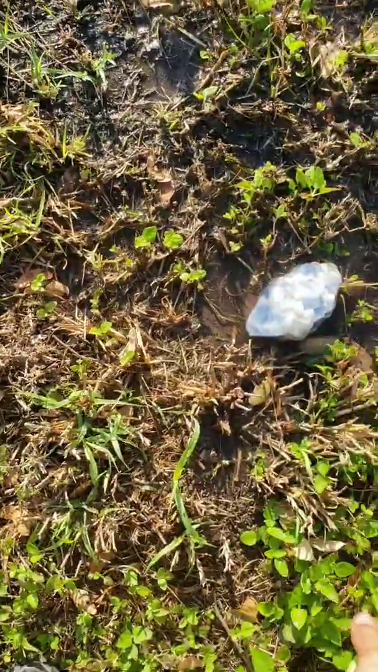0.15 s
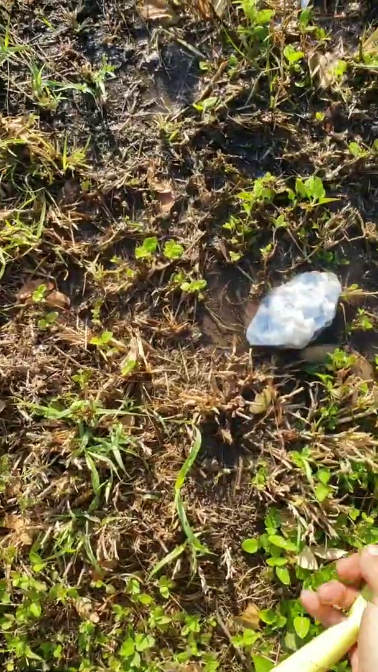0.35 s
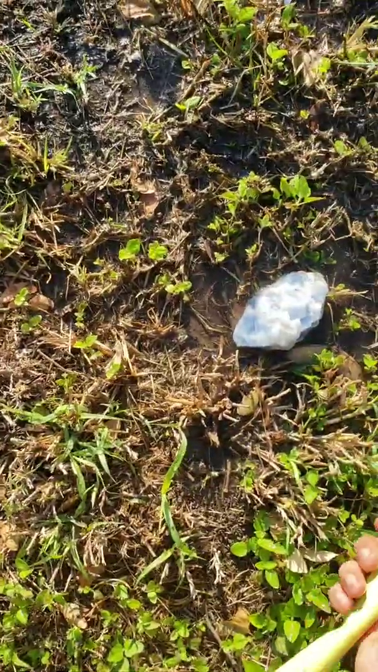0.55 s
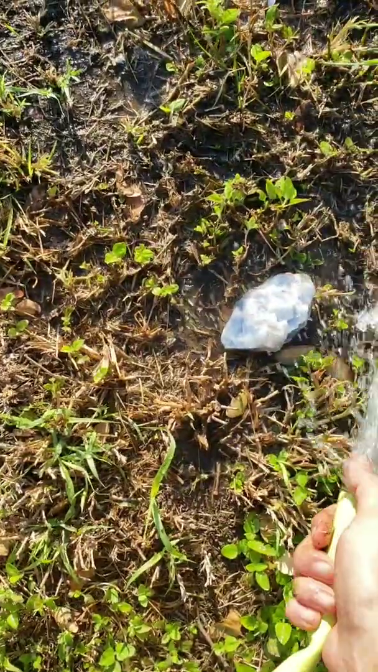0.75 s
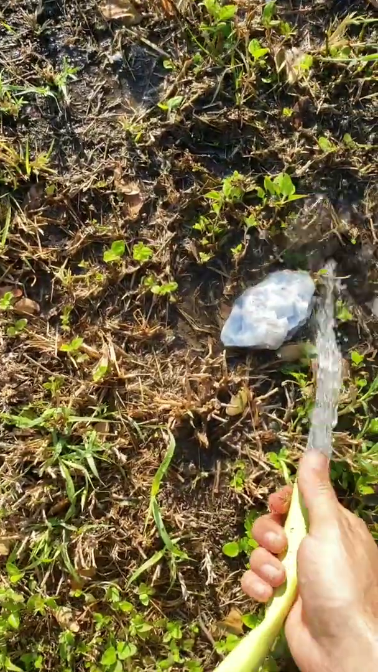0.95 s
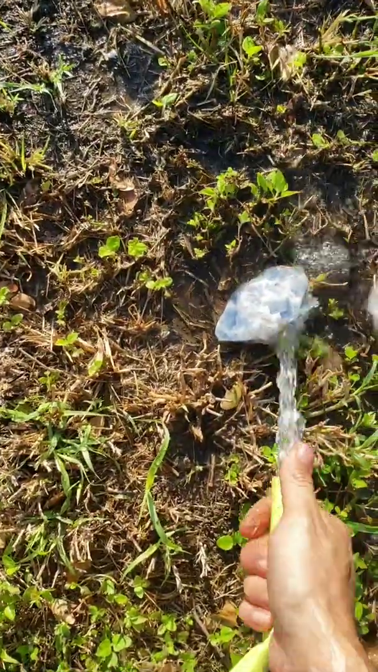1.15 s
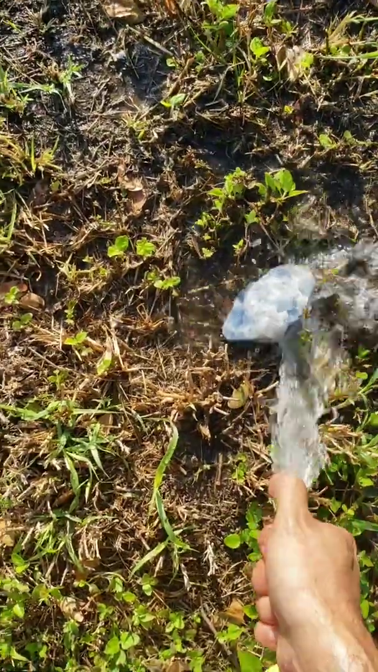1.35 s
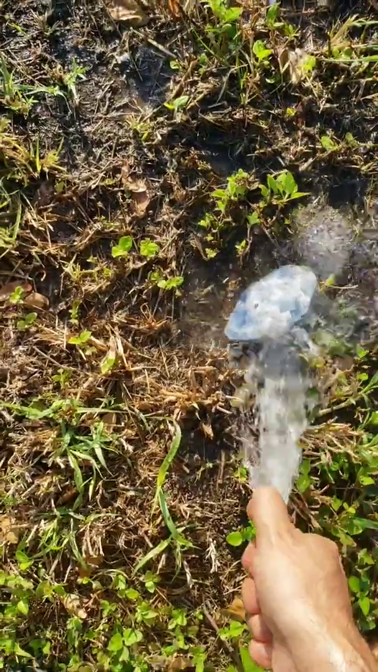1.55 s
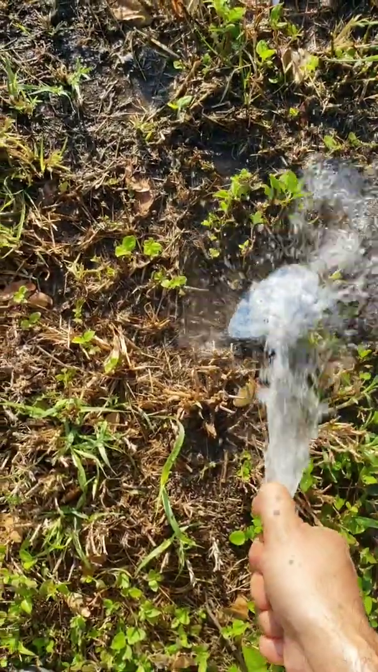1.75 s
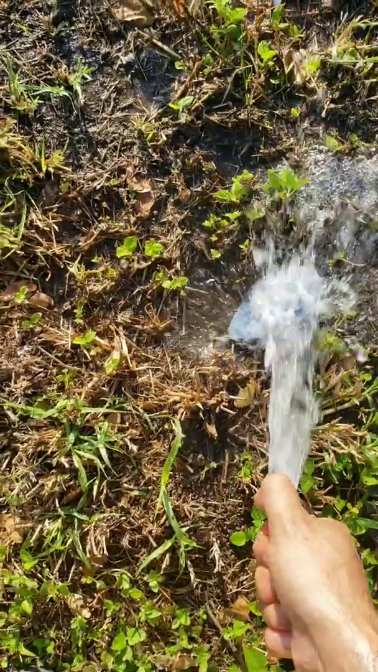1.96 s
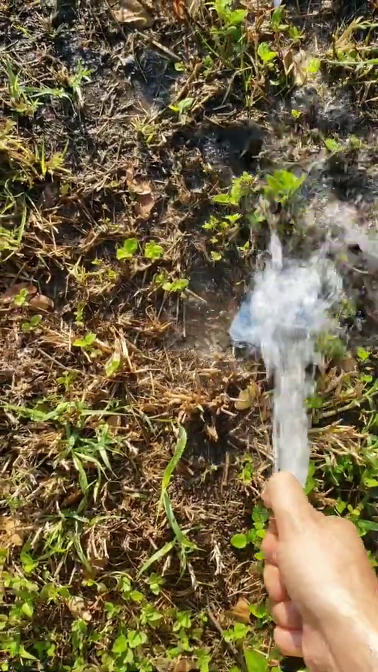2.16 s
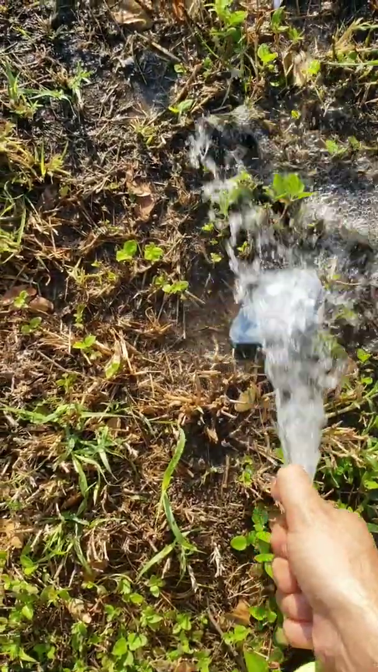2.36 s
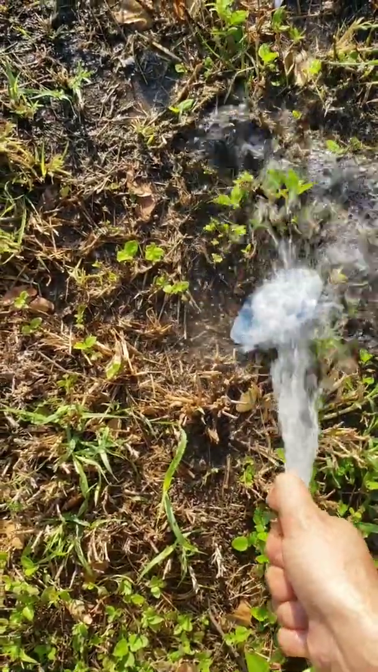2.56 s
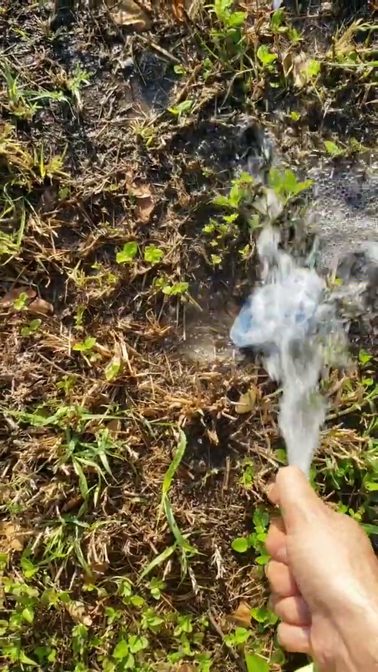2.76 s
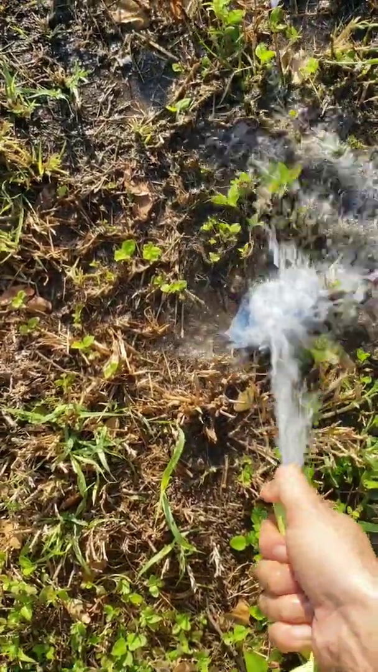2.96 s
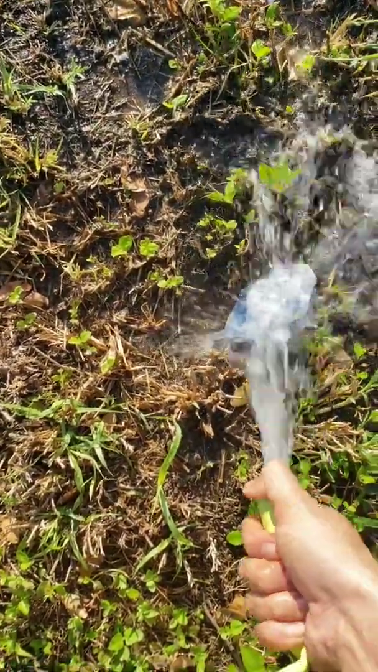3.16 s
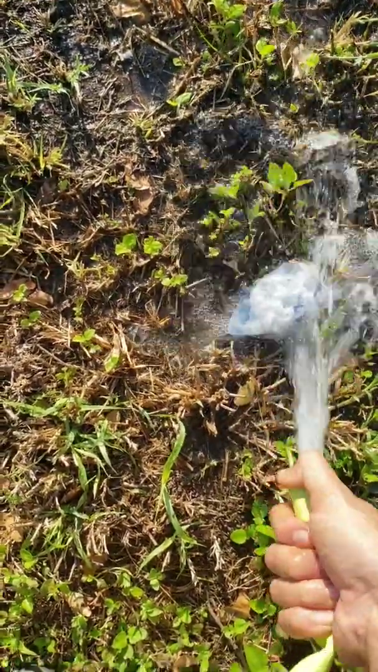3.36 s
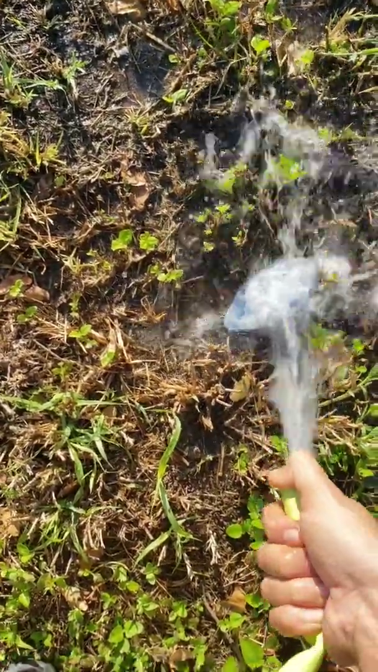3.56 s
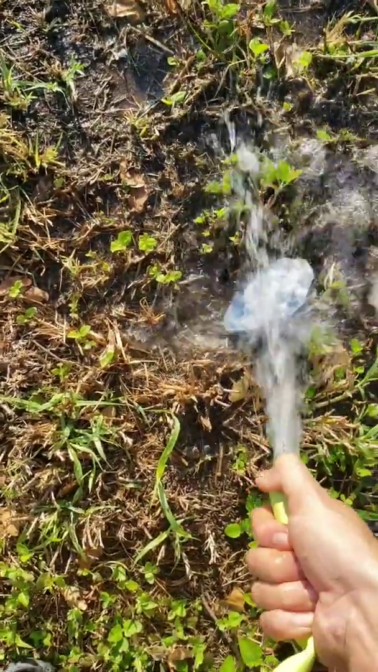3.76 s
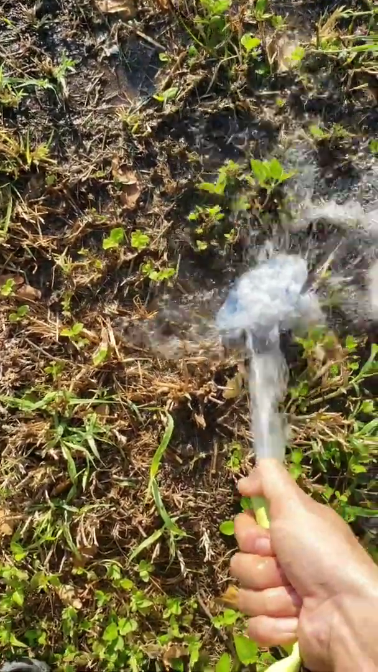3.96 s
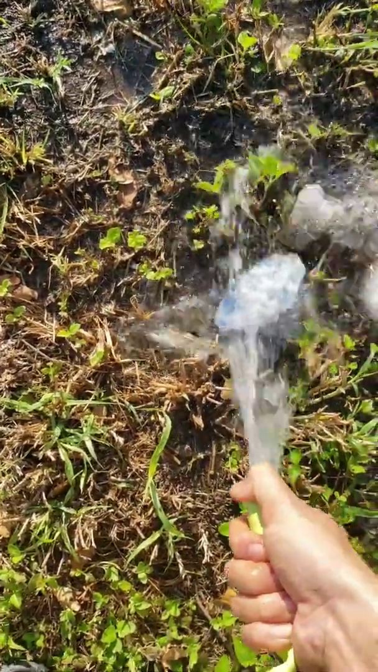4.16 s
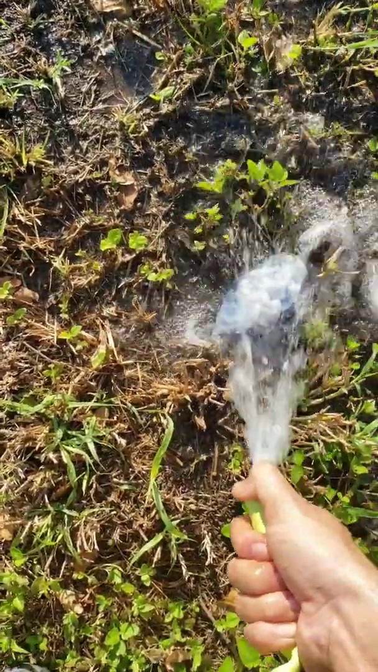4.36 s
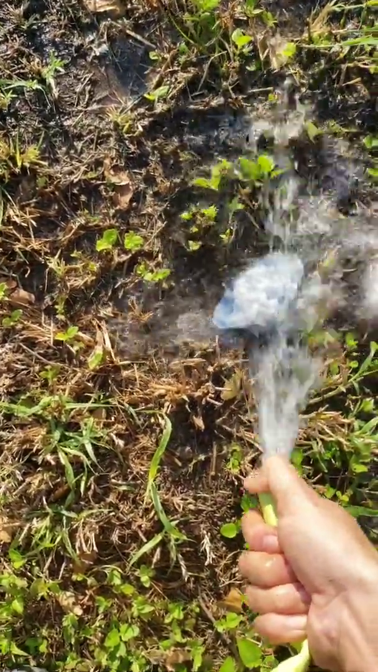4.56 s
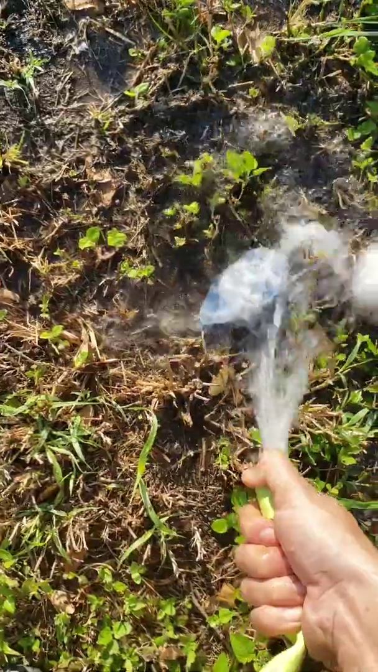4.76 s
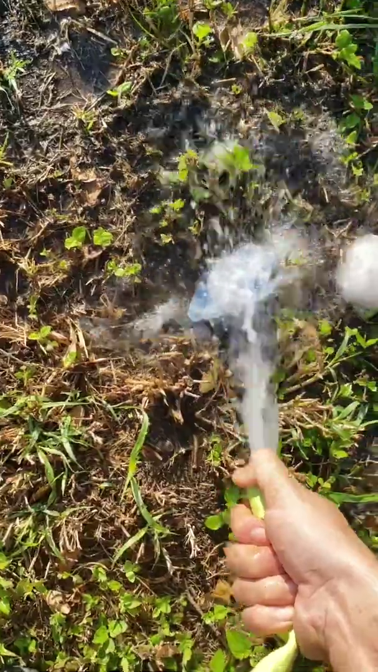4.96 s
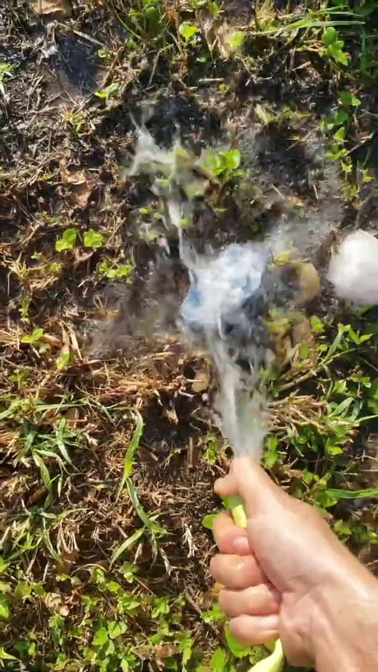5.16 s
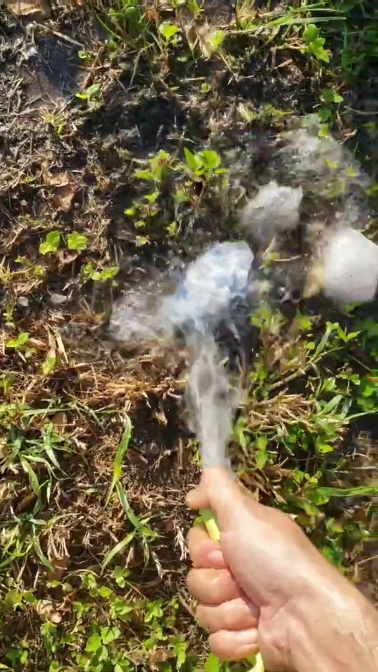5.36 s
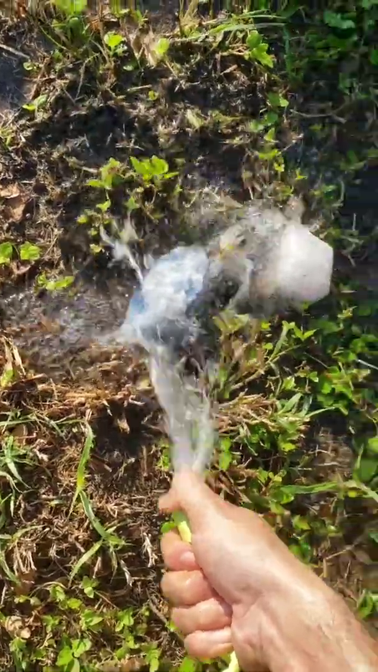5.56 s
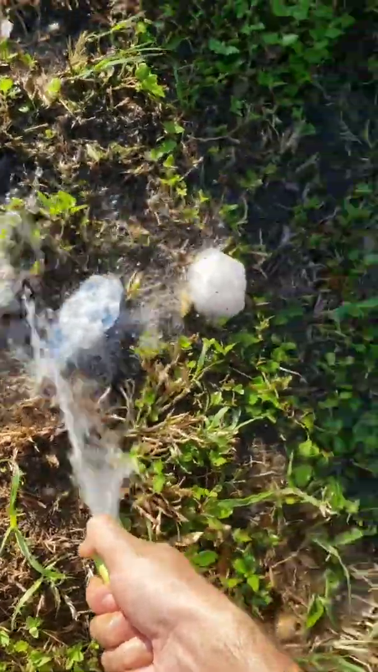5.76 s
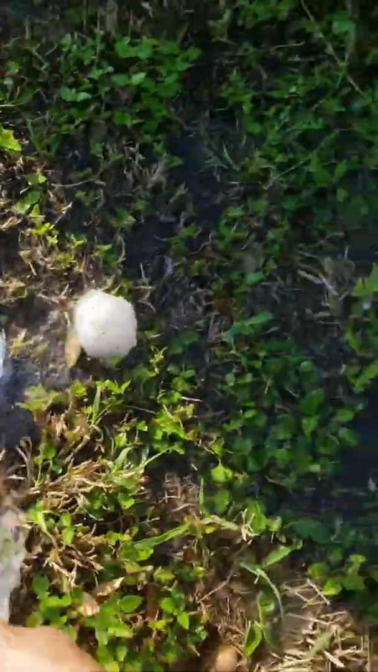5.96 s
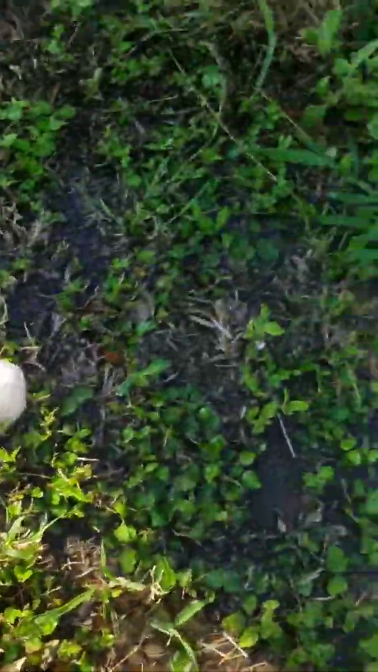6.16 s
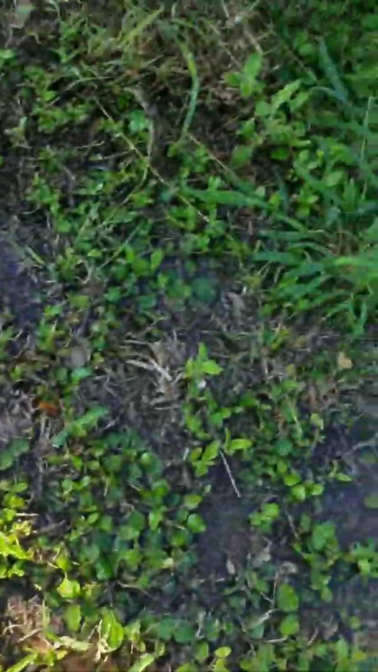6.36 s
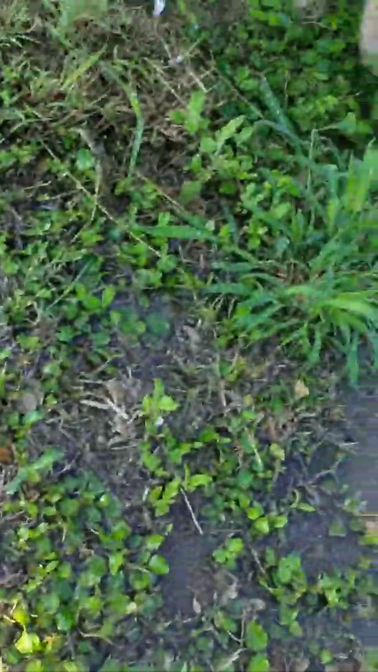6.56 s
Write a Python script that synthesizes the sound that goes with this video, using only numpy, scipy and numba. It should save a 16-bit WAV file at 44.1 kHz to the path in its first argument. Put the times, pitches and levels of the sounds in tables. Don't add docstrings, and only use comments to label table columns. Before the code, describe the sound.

A garden hose half closed by a thumb starts with squeaky gurgles and irregular spurts, bubbles popping over dry soil. Within two seconds it becomes a continuous crisp hiss with misty highs, crackling drops and small pulsing slugs of water. Distant hum and a weak accelerating engine lie beneath. The phone is close, outdoors with no room echo; it finally swings away, leaving the still-running spray a little softer and off to the left-right side.

```python
import sys
import numpy as np
from scipy import signal
from scipy.fft import rfft, irfft
from scipy.io import wavfile
from scipy.ndimage import uniform_filter1d
from numba import njit

SR = 44100
rng = np.random.default_rng(int(sys.argv[2]) if len(sys.argv) > 2 else 0)


def wrap_up_sound(samples):
    columns = np.atleast_2d(samples).T
    tamed = np.clip(columns, -1, 1)
    steps = np.round(tamed * 32767).astype(np.int16)
    wavfile.write(sys.argv[1], SR, steps)


def invert_db(x):
    u = np.asarray(x, float) / 20
    return 10 ** u


N = 291060

# (time [s], level [dB])
HUM = [(0.0, -56.5), (0.42, -53.5), (3.9, -52.5), (4.8, -53), (5.5, -52.5), (6.6, -50.5)]
# (frequency [Hz], density [dB per Hz])
TOWN_SPECTRUM = [(12, -39), (20, -15.5), (54, -0.5), (119, 3), (223, -3), (266, -3), (358, -7.5),
                 (528, -15), (577, -23.5), (640, -38), (700, -20.5), (910, -53), (1540, -120)]
# (frequency [Hz], density [dB per Hz])
AIR_SPECTRUM = [(350, -55), (600, 2), (1190, -17), (1750, -1), (2120, -46), (3530, -17), (9620, -8),
                (16000, -18)]
# (time [s], firing rate [Hz], level [dB])
VEHICLE = [(3.8, 76.8, -78), (4.1, 77.25, -66.5), (4.6, 86.3, -62), (4.8, 88.5, -63), (5.1, 94.9, -58.5),
           (5.5, 98, -56), (5.85, 99.5, -64), (6.2, 103.2, -67), (6.6, 105.3, -66.5)]
# (multiple of firing rate [1], level [dB])
ENGINE_ORDERS = [(0.5, -30), (1, 6), (1.5, -47), (2, -7.5), (2.5, -6.5), (3, -6), (3.5, -5.5), (4, -12),
                 (4.5, -10.5), (5, -38), (5.5, -17), (6, -18)]
# (time [s], peak [dB], pitch [Hz], left minus right [dB])
WIND_BUMPS = [(0.176, -48.5, 78.1, 23), (0.214, -49, 67, 16), (0.261, -39, 73, 6), (0.292, -34, 107, 0),
              (0.305, -32.5, 105, -6), (0.327, -33, 94, -1.0), (0.349, -41, 70.0, 6),
              (0.364, -46, 80.7, -13), (0.512, -32.5, 110, -3), (0.548, -41, 70.0, 1),
              (0.612, -31.5, 103, -4), (0.721, -41.5, 78.6, -10), (0.769, -47, 64, -14),
              (2.099, -70, 105, 14), (2.219, -99, 111, -6), (2.422, -43, 105, 2)]
# (time [s], peak [dB], start pitch [Hz], length [cycles], pitch gain [per cycle])
GURGLES = [
    (0.202, -36.5, 867, 14, 0.038),
    (.209, -30, 1505, 40, 0.067),
    (.226, -51, 2650, 43, .015),
]
# (time [s], peak [dB], pitch [Hz], length [cycles])
BUBBLES = [(0.378, -37, 1860, 18), (0.488, -35, 2070, 18), (0.511, -35, 1900, 18), (0.532, -30, 1760, 8.2),
           (0.761, -36, 2040, 10), (0.775, -36, 2070, 17), (0.787, -27, 1300, 12), (0.933, -31, 1750, 11),
           (1.0, -30, 2130, 9.1), (1.017, -22, 1640, 3.8), (1.042, -32, 2010, 9.2), (1.089, -29, 2180, 9.1),
           (1.167, -36, 1020, 10), (1.192, -25, 1520, 8.8), (1.243, -31, 1920, 15), (1.413, -28, 1840, 12)]
# (time [s], peak [dB], pitch [Hz])
PLOPS = [(0.2148, -28, 3080), (0.3, -28, 6520), (0.3721, -23, 4440), (0.5287, -20, 4000),
         (0.559, -23, 4030), (0.6005, -31, 4060), (0.6735, -23, 4320), (0.7282, -24, 3900),
         (0.7592, -15.5, 4170), (0.7896, -17, 6540), (0.8865, -20.5, 3020), (0.9348, -12, 6800),
         (0.961, -21, 3370), (1.0405, -22, 3330), (1.156, -27, 3500), (1.2234, -21, 4390),
         (1.3765, -16, 4200), (1.6087, -18, 3850), (1.9829, -18, 3200), (2.3213, -12, 4900),
         (2.371, -10.5, 4430), (2.5601, -14, 5900), (2.6982, -14.5, 3700), (3.5039, -20, 2560),
         (4.0257, -19, 3640), (5.2794, -16.5, 2700), (5.3148, -13, 4340), (6.131, -11, 6570),
         (6.3665, -17, 4770), (6.5696, -15, 3455)]
# (time [s], peak [dB], pitch [Hz])
TICKS = [(0.5042, -35, 14300), (0.5102, -18, 14900), (0.516, -39, 12500), (0.6145, -37, 13900),
         (0.7612, -39.5, 13100), (1.0021, -30, 12300), (1.0215, -15, 12100), (1.1598, -34, 15700),
         (1.2206, -29, 12400), (1.2496, -42, 15100), (1.3019, -31, 15000), (1.3269, -24, 15000),
         (1.3753, -35, 13800)]
# (time [s], flow against full jet [dB], thumb squeeze [0-1])
FLOW = [(0, -33, 0.7), (.19, -33.5, 0.9), (.27, -17, .3), (.3, -7.5, 0.2), (.4, -10, 0), (.7, -6.5, 0.48),
        (1.0, -5, 0.18), (1.27, -7, 0.2), (1.38, -2.5, 0.2), (1.75, 0, 1), (2.35, -1, 0.88),
        (2.6, 1.5, 0.81), (3.5, 1, 1), (4.1, 1.5, 1.07), (4.7, -0.5, 1), (5.9, 0.5, 0.9),
        (6.22, -3.5, 0.64), (6.6, -3.5, .5)]
# (time [s], splash gain [dB], length [s])
SLUGS = [(0.214, 22.5, 0.02), (0.308, 9.5, 0.0074), (0.327, -9.5, 0.05), (0.41, 7.5, .03), (.465, -7, .015),
         (0.686, -3, .03), (0.789, 6.5, 0.023), (0.954, 5.5, 0.014), (1.022, 10, 0.016), (1.18, 2, 0.041),
         (1.356, -7, 0.027), (1.41, 2.5, 0.044), (2.083, 3, 0.13), (2.264, -2, 0.034), (2.774, -3, 0.073),
         (2.96, 1.5, 0.013), (3.188, 4.5, 0.017), (3.296, -1.5, 0.054), (3.44, 3.5, 0.054),
         (3.574, -0.5, .03), (3.694, 3, 0.045), (3.973, 1, 0.032), (4.238, -5, 0.017), (4.707, -4.5, 0.016),
         (5.194, -3.5, 0.057), (5.29, 3.5, 0.046), (5.46, 2, 0.047), (5.668, 1.5, 0.024), (6.027, -1, .04),
         (6.573, 2.5, 0.026)]
# (time [s], jump [dB], fade [s])
SPURTS = [(.505, -4, 0.0079), (0.514, 2.5, 0.0096), (0.758, 7.5, 0.079), (1.023, 3, 0.006),
          (1.04, 12.5, 0.0088), (1.324, 6, 0.011), (1.376, 0, 0.026)]
# (time [s], left port lags right by [ms], scatter over the wet patch [ms])
AIM = [(0, -0.063, 0.02), (1.1, -0.082, .016), (1.8, -0.042, 0.038), (5.5, -0.045, .035),
       (5.8, 0.016, 0.044), (6.0, .16, 0.0179), (6.22, 0.23, 0.0082), (6.6, 0.24, 0.0073)]
LAYER_HZ = (400, 1400, 4500, 12000)
FLOW_SHARE = (2.1, 1.06, 1.09, 1.17)
SQUEEZE_DB = (7.5, 0.8, -1, 9.5)
SLUG_SHARE = (1.4, 1.23, 0.65, 0.35)
DRY_DB = (-10, -0.5, -0.5, -1.5)
# (frequency [Hz], density [dB per Hz])
WATER_SPECTRUM = [(150, -40), (250, -18.5), (350, -14.5), (676, -22), (819, -12), (1050, -10.5), (1680, -9),
                  (2550, -3), (2930, -4.5), (3610, 1), (5030, -0.5), (7000, 3.5), (17000, -6)]
# (frequency [Hz], gain [dB])
PORT_RESPONSE = [(7000, 1), (7600, -0.4), (8300, -4.5), (9500, -3), (10800, 1.5), (12200, 6.5),
                 (14000, 8.5), (15900, 11)]


def at(table, t):
    s, *columns = np.transpose(table)
    return [np.interp(t, s, c) for c in columns]


def colour(x, points):
    hz, db = np.transpose(points)
    f = np.maximum(np.fft.rfftfreq(N, 1 / SR), 1)
    gain = invert_db(np.interp(np.log(f), np.log(hz), db))
    return irfft(rfft(x) * gain, N)


def level(x, db):
    return x * invert_db(db) / np.sqrt(np.mean(x ** 2))


def walk(rate, count):
    hold = int(SR / rate)
    steps = np.repeat(rng.standard_normal((count, N // hold + 1)), hold, axis=1)[:, :N]
    w = uniform_filter1d(uniform_filter1d(steps, hold), hold)
    return w / w.std()


@njit
def ring(start, hz, cycles, size, glide, swell):
    out = np.zeros(N + 1)
    for k in range(len(start)):
        first = int(start[k]) + 1
        late = first - start[k]
        s = hz[k] / SR * (2j * np.pi - 4 / cycles[k])
        turn = np.exp(s)
        bend = np.exp(2j * np.pi * glide[k] * (hz[k] / SR) ** 2)
        z = size[k] * np.exp(s * late)
        fade = np.exp(swell * s.real)
        rise = fade ** late
        last = first + int(1.5 * cycles[k] * SR / hz[k]) + 2
        for j in range(max(first, 0), min(last, N)):
            out[j] += (1 - rise) * z.imag
            z, turn, rise = z * turn, turn * bend, rise * fade
    return out[:N]


def town():
    mid, side = colour(rng.standard_normal((2, N)), TOWN_SPECTRUM)
    side = colour(side, [(30, -2), (60, -9), (150, -11), (500, -3)])
    hum_db = at(HUM, np.arange(N) / SR)[0] + 2.0 * walk(8.1, count=1)[0]
    hum = invert_db(hum_db - 1.0) * np.array([mid + side, mid - side]) / mid.std()
    air = colour(rng.standard_normal((2, N)), AIR_SPECTRUM)
    return hum + level(air, -69.0)


def vehicle():
    t = np.arange(N) / SR
    hz, db = at(VEHICLE, t)
    upper_db = np.interp(t, (5.7, 6.12), (-0.5, 9.5))
    turn = 2 * np.pi * np.cumsum(hz * (1 + 0.013 * walk(17, count=1)[0])) / SR
    waver = walk(7.8, count=len(ENGINE_ORDERS))
    engine = np.zeros(N)
    for (order, order_db), w in zip(ENGINE_ORDERS, waver):
        line_db = order_db + 2.6 * w + upper_db * (order > 2.2)
        engine += invert_db(line_db) * np.sin(order * turn + 0.49 * w)
    fan = invert_db(-60.0 + 2.2 * waver[0]) * np.sin(2 * np.pi * 269 * t + 0.66 * waver[1])
    fan *= np.clip((t - 5.7) / 0.16, 0, 1)
    return np.sqrt(2) * (engine * invert_db(db) + fan)


def wind():
    t, db, hz, pan_db = np.transpose(WIND_BUMPS)
    slip = 0.00091 * rng.standard_normal(len(t))
    heard = []
    for side in (1, -1):
        size = invert_db(db + 11 + side * pan_db / 2)
        heard.append(ring((t + side * slip) * SR, hz, 0 * t + 2.4, size, 0 * t, 0.99))
    return np.array(heard)


def ground(x):
    delay_ms, echo_db, dull_hz = np.array([[0.89], [0.79]]), -20.5, 2780
    f = np.fft.rfftfreq(N, 1 / SR)
    soil = invert_db(echo_db) / (1 + (f / dull_hz) ** 2)
    echo = soil * np.exp(-2j * np.pi * f * delay_ms / 1000)
    return irfft(rfft(x) * (1 + echo), N)


def ports(t, hz, cycles, size, glide, place):
    lag, scatter = at(AIM, t)
    half = (lag + scatter * place) * SR / 2000
    one = np.ones(len(t))
    cycles = np.clip(cycles, 1, 60) * one
    swell = 2.25
    return np.array([ring(t * SR + side * half, hz * one, cycles, size * one, glide * one, swell)
                     for side in (1, -1)])


def plops():
    plop_rows = [(*row, 14.4) for row in PLOPS]
    t, db, hz, cycles = np.transpose([*BUBBLES, *plop_rows])
    out = ports(t, hz, cycles, invert_db(db + 2.5), 0.0048, 0)
    t, db, hz = np.transpose(TICKS)
    for ratio, late in ((0.8, 0), (1.07, 0.0), (0.66, .0023)):
        out += ports(t + late, ratio * hz, 12.0, invert_db(db - 4.5), 0, 0)
    t, db, hz, cycles, glide = np.transpose(GURGLES)
    return out + ports(t, hz, cycles, invert_db(db - 1.5), glide, 0)


def layers(t):
    flow_db, squeeze = at(FLOW, t)
    slug_db = sum(db * np.exp(-((t - s) / length) ** 2) for s, db, length in SLUGS)
    dry_soil = np.interp(t, (0.31, 2.4), (1, 0))
    bands = np.outer(FLOW_SHARE, flow_db) + np.outer(DRY_DB, dry_soil)
    return bands + np.outer(SQUEEZE_DB, squeeze - 1) + np.outer(SLUG_SHARE, slug_db)


def spray():
    count, crowd = 230000, .58
    u, g = rng.random((count, 5)).T, rng.standard_normal(count)
    t, hz = u[0] * N / SR, 250 * (17500 / 250) ** (u[1] ** crowd)

    bands = layers(t)
    between = np.interp(np.log(hz), np.log(LAYER_HZ), np.arange(4))
    low, k = np.minimum(between.astype(int), 2), np.arange(count)
    db = bands[low, k] + (between - low) * (bands[low + 1, k] - bands[low, k])
    for s, jump_db, fade in SPURTS:
        burst, hold_back = np.exp(-abs(t - s) / fade), -np.exp(-abs(t - s) / 0.081)
        db += jump_db * np.where(t > s, burst, hold_back) / 2

    thin = 1 + 0.15 * np.clip(-at(FLOW, t)[0], 0, 12)
    i, band = (t * SR).astype(int), (u[1] * 8).astype(int)
    db += 0.42 * walk(45, count=1)[0, i]
    db += 0.78 * walk(130, count=1)[0, i]
    db += 0.99 * thin * walk(60, count=8)[band, i]
    large_db = np.interp(np.log(hz), np.log(LAYER_HZ), (3.93, 3.05, 2.5, 0.95))
    db += large_db * np.minimum(-np.log(u[2]), 6.0)

    cycles = 7.8 * np.exp(0.56 * g) * (1 + (hz / 11000) ** 2)
    smack = (u[3] < .03) & (hz > 2000)
    cycles[smack] = 1.6
    db[smack] += 4.0
    size = invert_db(db) * hz / np.sqrt(cycles) * u[1] ** ((crowd - 1) / 2)

    stray = np.tan(np.pi * (u[4] - .5))
    drift = .35 * rng.standard_normal(count) * hz / 9000
    place = np.clip(np.sign(stray) * abs(stray) ** 1.7 + drift, -150, 150)
    drop = np.array([t, hz, cycles, size, 0.0078 * u[3], place])
    near = abs(stray) < 2
    drops = ground(ports(*drop[:, near])) + ports(*drop[:, ~near])
    return level(colour(drops, WATER_SPECTRUM), -30.5)


def scene():
    return spray() + ground(plops()) + wind() + vehicle() + town()


def band_limit(x):
    return signal.sosfilt(signal.butter(12, 17050, fs=SR, output="sos"), x)


def record(dry):
    heard = colour(dry, PORT_RESPONSE) * invert_db(np.array([[.25], [-.25]]))
    top_cut = signal.ellip(12, .3, 90, 15700, fs=SR, output="sos")
    return band_limit(signal.sosfilt(top_cut, heard))


dry = scene()
out = record(dry)
wrap_up_sound(out)
```